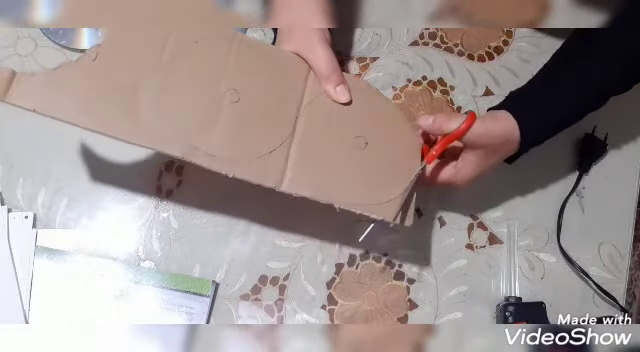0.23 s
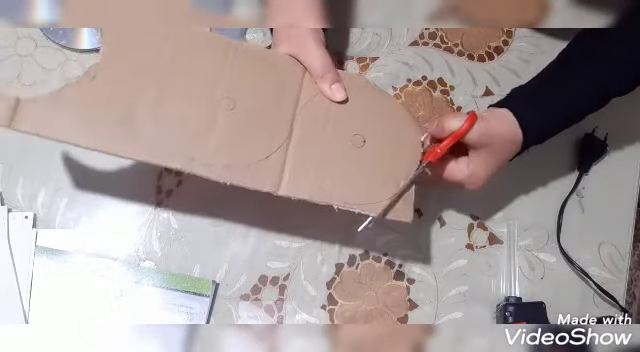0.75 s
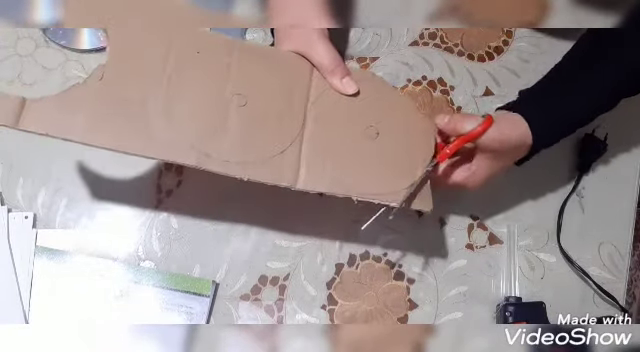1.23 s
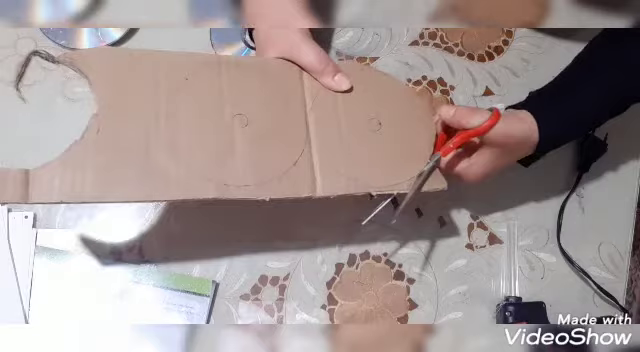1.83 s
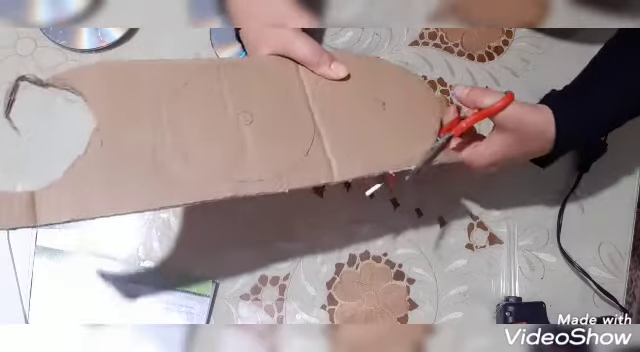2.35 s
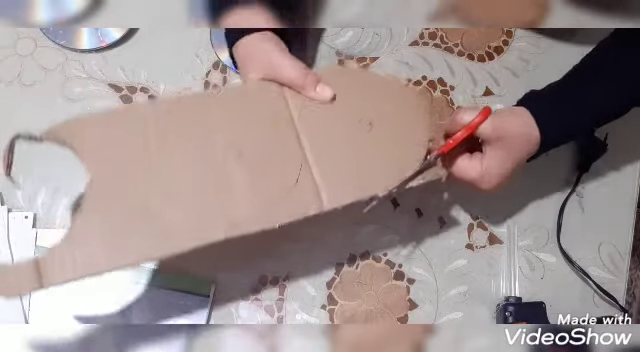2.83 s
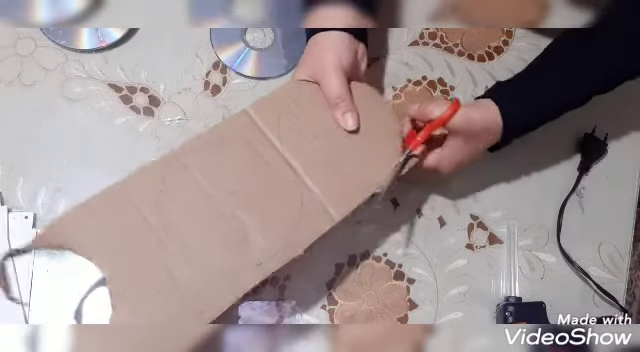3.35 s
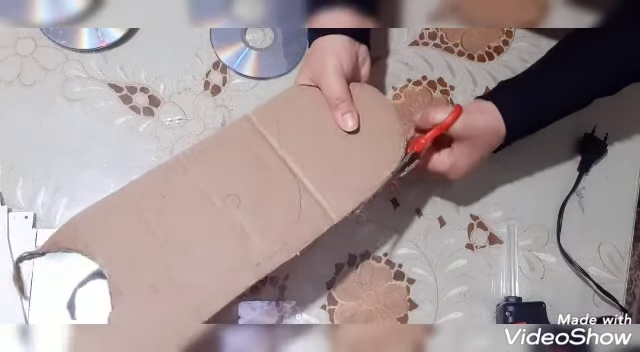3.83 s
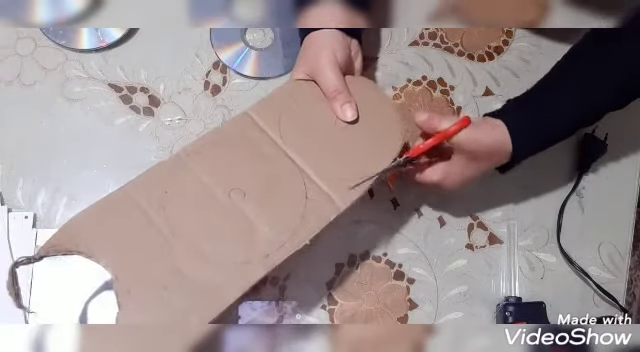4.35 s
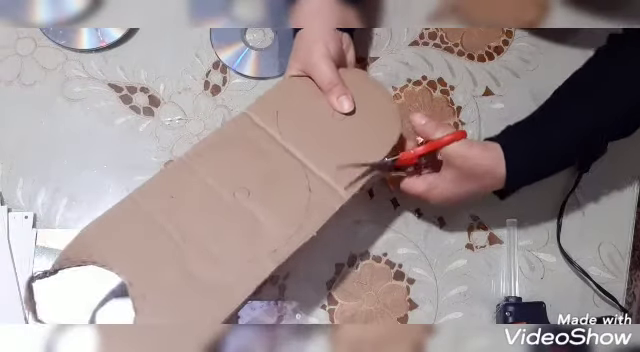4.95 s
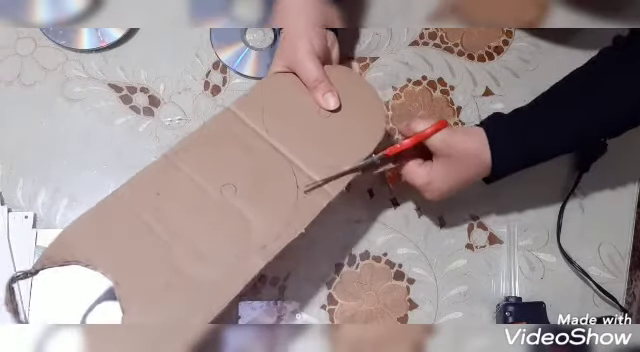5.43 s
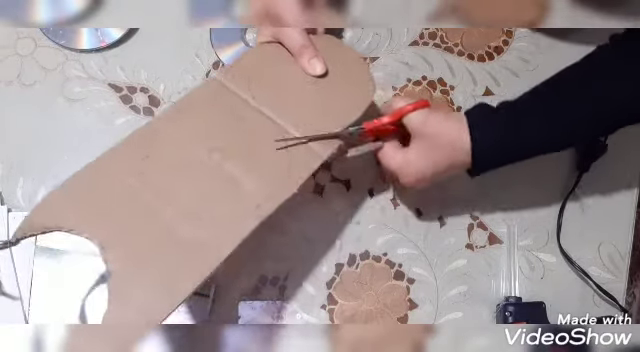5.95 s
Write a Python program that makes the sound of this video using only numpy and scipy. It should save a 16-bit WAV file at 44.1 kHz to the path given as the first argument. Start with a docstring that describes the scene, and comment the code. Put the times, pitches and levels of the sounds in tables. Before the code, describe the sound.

Scissors cut thick cardboard above a table in a small room. Each stroke ticks and crunches through fibres, then snaps sharply, the board giving a short boxy knock. Between strokes the blades slide open with a grainy hiss. Fingers and sleeve rustle softly over quiet room noise and faint hum. Close stereo microphones, short room echo.

```python
"""Scissors cut a sheet of thick cardboard held above a table in a small room.
Closing strokes crunch and tick through the fibres, as bursts and grains of noise, and snap:
sharp noise cracks, and a short push makes the sheet ring like a drumhead.
The blades also slide open with a grainy hiss, the sheet flexes with a low flutter,
and hands rustle throughout over quiet room noise and a faint hum."""
import sys
import numpy as np
from scipy import signal
from scipy.fft import rfft, irfft, next_fast_len
from scipy.io import wavfile
from scipy.ndimage import map_coordinates

SR = 44100
rng = np.random.default_rng(int(sys.argv[2]) if len(sys.argv) > 2 else 0)


def store_wav(level_fs):
    """Save 16-bit WAV to argv[1]."""
    pcm = np.round(np.clip(np.atleast_2d(level_fs), -1, 1) * 32767)
    wavfile.write(sys.argv[1], SR, pcm.T.astype(np.int16))


N = 273067  # length of the scene in samples


def amp(db):
    """Turn decibels into a plain multiplier."""
    return 10 ** (np.asarray(db) / 20)


def unit(x):
    """Scale a sound to an rms (average strength) of 1."""
    return x / np.sqrt(np.mean(x ** 2) + 1e-20)


def along(points, hz):
    """Read a curve of (f/Hz, value) points, joined by straight lines over log frequency."""
    f, v = np.transpose(points)
    return np.interp(np.log(hz + 1), np.log(f), v)


def filtered(x, response):
    """Make each frequency of x stronger or weaker by response(hz)."""
    n = x.shape[-1]
    padded = next_fast_len(n + 4096)  # spare room keeps the end from wrapping onto the start
    hz = np.fft.rfftfreq(padded, 1 / SR)
    return irfft(rfft(x, padded) * response(hz), padded)[..., :n]


def coloured(x, spectrum):
    """Shape x by a table of levels over frequency, then set its rms to 1."""
    return unit(filtered(x, lambda hz: amp(along(spectrum, hz))))


def wobble(rate):
    """Draw a smooth random curve through `rate` random points a second."""
    knots = rng.standard_normal(int(N * rate / SR) + 4)
    return map_coordinates(knots, [np.arange(N) * rate / SR])


# how alike left and right are in sound from all sides: f/Hz, likeness (0 to 1)
LIKENESS = [(100, 1), (600, 0.63), (1100, 0.043), (2000, 0.017)]


def diffuse(size):
    """Make stereo noise from all sides: alike in the bass, unrelated in the treble."""
    def mid_and_side(hz):
        turn = np.arccos(np.clip(along(LIKENESS, hz), 0, 1)) / 2
        return np.array([np.cos(turn), np.sin(turn)])

    mid, side = filtered(rng.standard_normal((2, size)), mid_and_side)
    return np.array([mid + side, mid - side])


def grain(rate, spread_db, life_s):
    """Build an rms-1 envelope of tiny, fading fibre breaks of uneven size, `rate` a second."""
    happens = rng.random(N) < rate / SR
    size_db = spread_db * np.minimum(rng.exponential(size=N), 3)
    breaks = happens * amp(size_db)
    decay = np.exp(-np.arange(SR // 50) / SR / life_s)
    power = signal.fftconvolve(breaks ** 2, decay)[:N]
    return unit(np.sqrt(np.abs(power)))


def add(track, s, sound):
    """Mix a sound into the track at time s, cutting off what runs past the end."""
    part = track[:, round(s * SR):][:, :sound.shape[-1]]
    part += sound[..., :part.shape[-1]]


# how long the room takes to fade by 60 dB: f/Hz, t/s
ROOM_FADE_TIMES = [(150, .26), (500, 0.29), (2500, 0.33), (8000, 0.29), (16000, 0.25)]
# tone of the room's answer: f/Hz, relative level/dB
ROOM_TONE = [(150, 11), (600, -2.5), (1400, 0), (2500, -0.5), (8000, -3.5), (16000, -3)]


def room(x, gap_s=0.00033):
    """Add up echoes from table and walls as fading noise, each frequency dying at its own speed."""
    hz, t, noise = signal.stft(diffuse(SR // 2), SR, nperseg=256)
    t60 = along(ROOM_FADE_TIMES, hz)[:, None]
    tone_db = along(ROOM_TONE, hz)[:, None]
    # the last factor gives slow and fast fades the same total energy
    fade = amp(tone_db - 60 * t / t60) * np.sqrt(2 * np.log(1000) / (t60 * SR))
    tail = signal.istft(noise * fade, SR, nperseg=256)[1]
    # echoes start softly, just after the direct sound
    onset = 1 - np.exp(-(np.arange(tail.shape[1]) / SR / gap_s) ** 2)
    return signal.fftconvolve(x, tail * onset, axes=1)


# tone of skin and cloth on the board: f/Hz, relative level/dB (per Hz)
RUSTLE_TONE = [(2500, -7.5), (8500, 2.5), (16000, -2.5)]
# how busy the hands are; they rest before the third stroke: t/s, middle level/dB
HANDS = [(0, -69.5), (0.451, -74), (1.2, -60.5), (1.9, -67), (2.1, -82), (2.45, -78.5), (2.799, -65.5),
         (4.3, -70.5), (6.19, -67.5)]


def rustle(restless_db=4.0):
    """Fingers and sleeve never keep quite still: grainy noise whose level wanders."""
    grains = grain(rate=360, spread_db=3.5, life_s=0.0043)
    fibres = coloured(diffuse(N) * grains, RUSTLE_TONE)
    level_db = np.interp(np.arange(N) / SR, *np.transpose(HANDS))
    return amp(level_db + restless_db * wobble(1.5)) * fibres


# tone of the quiet room noise: f/Hz, relative level/dB (per Hz)
ROOM_NOISE = [(20, -35.5), (45, -5), (110, -7), (200, -5), (300, -8), (450, -8.5), (680, -16.5),
              (1100, -19.5), (1600, -27.5), (4000, -39.5), (9000, -34.5), (16000, -35.5)]
# faint tones in the room: f/Hz, level/dB before wavering, waver (0 to 1)
HUM_TONES = [(99, -78.5, 0.22), (298, -70.5, .35), (658, -79, .9)]


def ambience(level_db=-67.5):
    """Quiet room noise, plus hum tones that waver in strength and phase."""
    t = np.arange(N) / SR
    hum = np.zeros(N)
    for hz, db, waver in HUM_TONES:
        strength = amp(db) * np.sqrt(2) * (1 + waver * wobble(7.4))
        hum += strength * np.sin(2 * np.pi * hz * t + 2 * waver * wobble(14))
    return amp(level_db) * coloured(diffuse(N), ROOM_NOISE) + hum


# tone of rubbing at the edge of the board: f/Hz, relative level/dB (per Hz)
HISS_TONE = [(800, -32), (2000, -7), (3200, -2), (5000, -1.5), (8000, 1.5), (10500, -1.5), (13000, 0.5),
             (16000, -8)]
# tone of rubbing heard through the sheet: f/Hz, relative level/dB (per Hz)
BODY_TONE = [(120, -16), (250, 3), (600, 0.5), (860, 7), (1250, -6), (1550, -6.5), (2200, 1), (3500, -8),
             (7000, -24.5)]


def friction(rows, grains, pan_db=1, wet_db=-2, roundness=0.65, focus=1.3):
    """Grains hiss at the board's edge and sound through the sheet, coloured by where it is touched."""
    dry = np.zeros((2, N))
    sides = amp([[pan_db], [-pan_db]])  # the hiss leans left
    for s, length, hiss_db, body_db, centre_hz in rows:
        rough = grains[round(s * SR):][:round(length * SR)]
        size = len(rough)
        hiss = coloured(diffuse(size) * rough, HISS_TONE)
        # the sheet is driven most around centre_hz
        drive = filtered(diffuse(size) * rough,
                         lambda f: 1 / (1 + (focus * np.log((f + 1) / centre_hz)) ** 2))
        body = coloured(drive, BODY_TONE)
        speed = np.hanning(size) ** (roundness / 2)  # the hand speeds up and eases off
        add(dry, s, speed * (amp(hiss_db) * sides * hiss + amp(body_db) * body))
    return dry + amp(wet_db) * room(dry)[:, :N]


# the blades slide open along the cut edge, one row a slide:
# start t/s, length t/s, relative hiss level/dB, relative body level/dB, body centre f/Hz
BLADE_SLIDES = [(.155, .11, -50.5, -50.5, 770), (.975, .12, -45.5, -44, 755),
                (1.738, .086, -42.5, -49.5, 842), (2.892, .098, -46, -49, 1850),
                (3.066, .09, -46.5, -53, 1710), (3.312, .15, -46, -47.5, 1300),
                (4.12, .145, -49, -50.5, 1430), (4.835, .14, -42.5, -48.5, 1700),
                (5.608, .09, -37.5, -47.5, 1590)]


def slides(uneven_db=2.0):
    """Sliding on the board makes a fine, dense grain that swells as the pressure wavers."""
    pressure = unit(amp(uneven_db * wobble(35)))
    return friction(BLADE_SLIDES, grain(rate=1900, spread_db=5, life_s=0.0039) * pressure)


def burst(t, spectrum, rise_s, shared=0.072):
    """A rip of a few milliseconds: noise that jumps up and dies, mostly different left and right."""
    common, *apart = rng.standard_normal((3, len(t)))
    mixed = np.sqrt(shared) * common + np.sqrt(1 - shared) * np.array(apart)
    shape = (t / rise_s) ** 2 * np.exp(-2 * t / rise_s)  # highest at rise_s
    return coloured(mixed, spectrum) * shape / np.sqrt(np.mean(shape[:SR // 250] ** 2))


# ways the held sheet rings (modes), before small random shifts:
# f/Hz, relative level/dB, time to fade by 60 dB t/s
SHEET_MODES = [(225, -15, 0.013), (350.3, -13.5, 0.13), (447.7, -4, 0.067), (491.5, 1, 0.03),
               (590, -10, 0.11), (693, -2.5, 0.092), (775.6, 9.5, 0.035), (950, -13.5, 0.064),
               (1036, -6.5, 0.069), (1340, -24.5, .02), (1770, -1, 0.05), (1930, -1, 0.022),
               (2570, -10, .01), (3300, -11, .008)]


def kick(t, hz, cycles=0.18, ring_db=9.5, scatter_db=2, drift=0.013, leak_hz=255, apart_hz=1150):
    """A torn flute (one ridge of the corrugation) jerks the sheet once, and the sheet rings briefly."""
    def head(x):
        """Set the rms of the first 6 ms or so to 1."""
        return x / np.sqrt(np.mean(x[..., :SR // 160] ** 2))

    u = t * hz / cycles
    push = head(u ** 2 * np.exp(-u) * np.sin(2 * np.pi * hz * t))
    modes = np.zeros((2, len(t)))
    for f, db, t60 in SHEET_MODES:
        # high modes reach the two microphones out of step
        turn = rng.normal() * (f / apart_hz) ** 2 * np.array([[1], [-1]])
        # the grip shifts each mode a little
        strength = amp(db + scatter_db * rng.normal() - 60 * t / t60)
        shifted_hz = f * (1 + drift * rng.normal())
        modes += strength * np.cos(2 * np.pi * shifted_hz * t + turn)
    ring = head(signal.fftconvolve(push[None], modes, axes=1)[:, :len(t)])
    # air leaks round the edges of the sheet, so it radiates little bass
    leak = signal.iirfilter(N=3, Wn=leak_hz, btype="high", fs=SR, output="sos")
    return head(signal.sosfilt(leak, push + amp(ring_db) * ring))


# the board gives way under the blades, one row a snap:
# t/s, relative crack level/dB, relative kick level/dB, kick f/Hz
BOARD_SNAPS = [(0.3543, -54.5, -63.5, 900), (.469, -50.5, -34, 524), (.5857, -50, -53, 676),
               (0.6906, -32.5, -25.5, 556), (0.7909, -22, -18.5, 710), (1.1784, -44.5, -42.5, 890),
               (1.274, -46.5, -53, 390), (1.3776, -40, -38.5, 522), (1.4438, -26.5, -35, 676),
               (1.466, -33.5, -29.5, 514), (1.5272, -31, -42, 670), (1.562, -33, -59, 590),
               (1.8501, -59, -47, 750), (2.5111, -52, -62, 320), (2.5959, -45.5, -66, 388),
               (2.651, -39.5, -40, 400), (2.6856, -31.5, -42.5, 560), (2.765, -30, -20.5, 550),
               (2.7807, -36, -26, 574), (3.6772, -36, -50.5, 633), (3.8196, -23.5, -27, 702),
               (3.8383, -37, -28, 775), (3.8974, -21, -18, 877), (4.4626, -32, -49.5, 900),
               (4.528, -26, -33, 643), (4.5631, -28.5, -30.5, 790), (4.6224, -23.5, -18, 1166),
               (5.2235, -44, -67.5, 487), (5.3037, -31, -40, 930), (5.3187, -28, -35.5, 645),
               (5.3442, -31.5, -31, 810), (5.3736, -46, -32.5, 443), (5.4006, -32, -20, 710),
               (5.4845, -38, -64, 660), (5.653, -27.5, -42.5, 860), (5.7545, -43.5, -46, 810),
               (5.9337, -40, -40.5, 382), (5.992, -16.5, -26.5, 240), (5.9951, -21.5, -28.5, 760)]
# tone of the liner or fibres cracking: f/Hz, relative level/dB (per Hz)
CRACK_TONE = [(300, -16), (1200, -11.5), (2200, -3.5), (3500, -5.5), (5200, -3), (7800, 1), (9800, -2),
              (11800, 0.5), (16000, -6)]
# tone of a collapsing ridge of the corrugation: f/Hz, relative level/dB (per Hz)
CRUSH_TONE = [(500, -16.5), (1100, -3.5), (1500, -8), (2000, 8.5), (2700, -1.5), (3600, -1), (5500, -11),
              (12000, -34)]


def snaps(crack_db=-1, crush_db=-8.5, crush_slope_db=8, pan_db=1.0, kick_wet_db=-2,
          quick_s=0.0013, slow_s=0.0018):
    """In every snap the liner (outer paper) cracks, a flute is crushed and the sheet is kicked."""
    out = np.zeros((2, N))
    t = np.arange(SR // 8) / SR
    sides = amp([[pan_db], [-pan_db]])  # the crack leans left
    hardest_db = max(row[2] for row in BOARD_SNAPS)
    for s, rip_db, push_db, hz in BOARD_SNAPS:
        thump = amp(push_db) * kick(t, hz)
        # a hard snap parts the fibres at once, a light one tears them one after another
        rise_s = slow_s + (quick_s - slow_s) * amp((push_db - hardest_db) / 2)
        crack = amp(rip_db + crack_db) * burst(t, CRACK_TONE, rise_s) * sides
        # the flute crunches most when a strong rip meets a quick kick
        quickness_db = crush_slope_db * np.log2(hz / 750)
        crush = amp((push_db + rip_db) / 2 + crush_db + quickness_db) * burst(t, CRUSH_TONE, rise_s)
        add(out, s, thump + crack + crush)
        add(out, s, room(amp(kick_wet_db) * thump + crack + crush))
    return out


# the blades close through the fibres, one row a squeeze:
# start t/s, length t/s, relative hiss level/dB, relative body level/dB
BLADE_CUTS = [(0.593, .09, -50.5, -58), (1.426, .14, -44.5, -53), (2.67, .11, -52.5, -53),
              (3.674, 0.15, -50, -58), (4.36, .07, -60.5, -68.5), (4.468, 0.11, -52, -50.5),
              (5.121, 0.23, -56, -68.5), (5.289, .17, -45.5, -58), (5.873, 0.085, -40.5, -45.5)]


def crunch(cut_hz=950):
    """Fibres break in quick succession along the closing blades, driving the sheet near cut_hz."""
    rows = [(*cut, cut_hz) for cut in BLADE_CUTS]
    return friction(rows, grain(rate=300, spread_db=5, life_s=.0014))


def ticks(per_s=42, over_hiss_db=-0.5, spread_db=15, kick_db=-11, wet_db=-1,
          rise_s=0.0025, kick_hz=600, count=10):
    """While the blades close, small fibres part one by one at uneven steps, each with a small kick."""
    dry = np.zeros((2, N))
    t = np.arange(SR // 16) / SR
    for start, length, hiss_db, _ in BLADE_CUTS:
        thump = amp(kick_db) * kick(t, kick_hz)  # shared by all ticks of this cut
        for k in range(count):
            age = (k + rng.random()) / per_s  # seconds into the cut
            size_db = spread_db * (rng.random() - .5)
            crack = burst(t, CRACK_TONE, rise_s)
            if age < length:
                add(dry, start + age, amp(hiss_db + over_hiss_db + size_db) * (crack + thump))
    return dry + amp(wet_db) * room(dry)[:, :N]


# the sheet flexes in the hand as it is turned: start t/s, length t/s, level at the top of the swell/dB
SHEET_FLEXES = [(1.796, 0.13, -57), (3.663, 0.17, -50.5), (4.877, 0.18, -50.5), (5.288, 0.23, -45.5),
                (5.63, .1, -44), (5.894, 0.12, -48.5)]


def flexes(centre_hz=178, sharpness=1.33):
    """The whole sheet bends with a soft low flutter that swells and fades, alike at both microphones."""
    swell = np.zeros((2, N))
    flutter = unit(filtered(rng.standard_normal(N),
                            lambda f: 1 / (1 + (sharpness * np.log((f + 1) / centre_hz)) ** 4)))
    for s, length, db in SHEET_FLEXES:
        add(swell, s, amp(db) * np.hanning(round(length * SR)))
    return swell * flutter


def scene():
    """Cutting, sliding and handling over the quiet room."""
    return rustle() + ambience() + slides() + snaps() + crunch() + ticks() + flexes()


def record(dry, top_hz=16100):
    """The recorder keeps nothing from its band limit, top_hz, upwards."""
    return filtered(dry, lambda hz: hz < top_hz)


dry = scene()
out = record(dry)
store_wav(out)
```